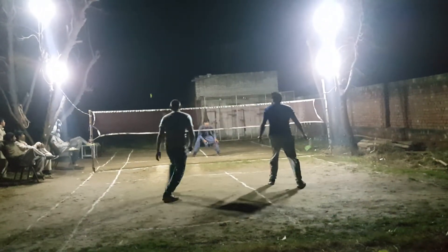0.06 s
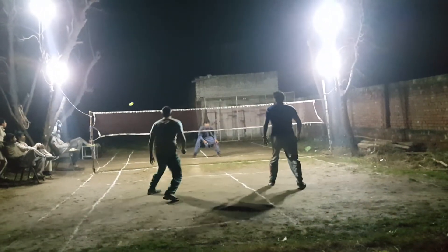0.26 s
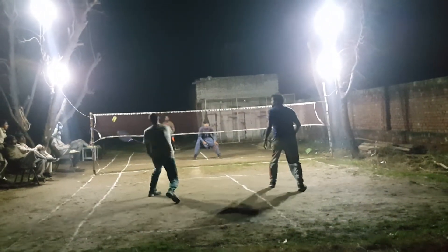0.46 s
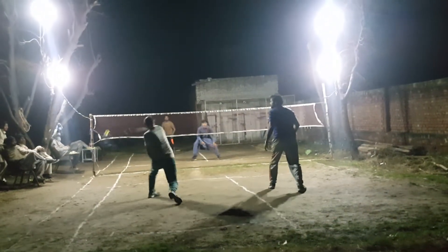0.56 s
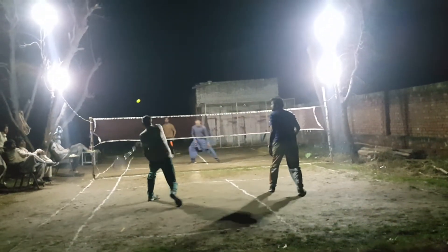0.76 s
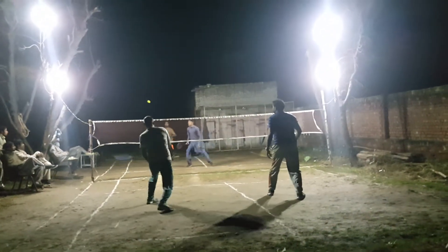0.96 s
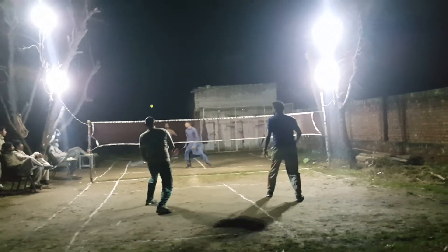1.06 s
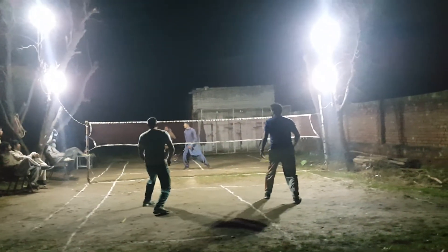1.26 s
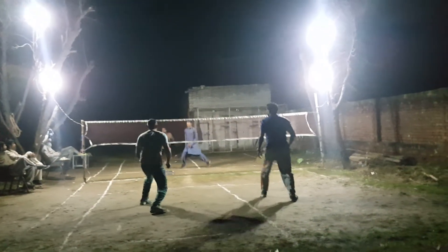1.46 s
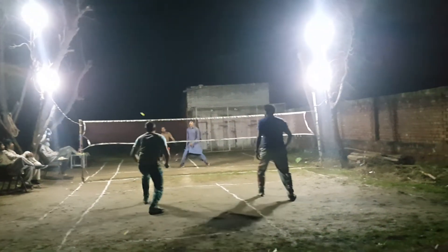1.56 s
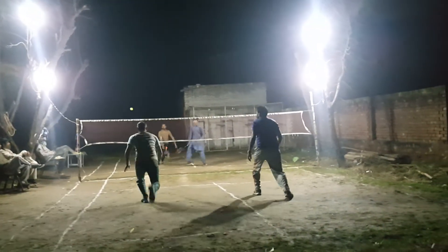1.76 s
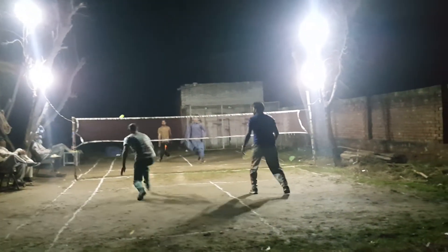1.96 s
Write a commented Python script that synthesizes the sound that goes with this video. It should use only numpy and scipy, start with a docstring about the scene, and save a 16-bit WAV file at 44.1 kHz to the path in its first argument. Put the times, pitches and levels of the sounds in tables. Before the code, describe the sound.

Badminton hits echo across an outdoor court, with footsteps, gritty scuffs and small dry ticks.

```python
"""A badminton rally on an outdoor dirt court, over the faint, steady rumble of night air.
First a sole scuffs the grit and a shoe lands. Then comes a hard smash: the cork knocks, the strings
ring, the ground bounce adds a hollow colour and the walls echo. A softer return follows.
After one second small dry ticks begin close by, and a distant third stroke comes at a second and a half.
The rally ends with more steps, ticks and the loudest scuffs."""
import sys
import numpy as np
from scipy import signal
from scipy.fft import rfft, irfft
from scipy.io import wavfile

SR = 44100
rng = np.random.default_rng(int(sys.argv[2]) if len(sys.argv) > 2 else 0)


def generate_wav(signal):
    """Clip the signal to [-1, 1] and save it as 16-bit WAV at the path in sys.argv[1]."""
    frames = np.transpose(np.atleast_2d(signal))
    scaled = np.clip(frames, -1, 1) * 32767
    pcm = np.round(scaled).astype(np.int16)
    wavfile.write(sys.argv[1], SR, pcm)


N = 88200


def undb(db):
    """Turn decibels into a number to multiply by."""
    return 10 ** (np.asarray(db) / 20)


def level(x, db):
    """Give a short sound the energy of 10 ms at this level."""
    energy = np.mean(np.sum(x ** 2, axis=-1))
    return x * undb(db) / np.sqrt(energy / (SR / 100) + 1e-20)


def curve(points, hz):
    """Read between (Hz, value) points, with all octaves equally wide."""
    p = np.array(points, float)
    return np.interp(np.log(hz + 1), np.log(p[:, 0]), p[:, 1])


def bins():
    """The frequencies in Hz on which the filters work."""
    return np.arange(N + 1) * SR / (2 * N)


def shape(x, db):
    """Turn each frequency up or down by its dB value, without ringing ahead of the sound."""
    cepstrum = irfft(db * np.log(10) / 20)
    cepstrum[1:N] *= 2
    cepstrum[N + 1:] = 0
    return irfft(rfft(x, 2 * N) * np.exp(rfft(cepstrum)))[..., :N]


def hump(hz, octaves):
    """A rounded peak around one frequency, in dB."""
    distance = np.log2((bins() + 10) / hz) / octaves
    return -20 * np.log10(1 + distance ** 2 / 2 + distance ** 4 / 10)


def fade(t60):
    """Die away by 60 dB in t60 seconds, the fade time."""
    return undb(-60 * np.arange(N) / SR / max(t60, .001))


def noise():
    """Stereo noise, alike in both ears in the bass and wide in the treble."""
    # Each row: frequency in Hz, level in dB of the side signal against the middle one.
    width = [(60, -19), (250, -11.5), (600, -3.5), (1500, -1.5), (4000, 0.5), (16000, 1.5)]
    mid, side = rng.standard_normal((2, N))
    side = irfft(rfft(side) * undb(curve(width, bins()[::2])), N)
    return np.array([mid + side, mid - side])


def delay(x, s):
    """Start a sound s seconds later."""
    return irfft(rfft(x, 2 * N) * np.exp(-2j * np.pi * bins() * s))[..., :N]


def pan(x, db):
    """Lean a sound to the left by db, or to the right if db is negative."""
    return x * undb(np.array([[db], [-db]]) / 2)


def through(x, response):
    """Play a sound through a stereo pattern of echoes."""
    return signal.fftconvolve(np.atleast_2d(x), response, axes=-1)[:, :N]


def night_air(level_db=-62):
    """The surroundings give a low, steady rumble with a thin hiss."""
    # Each row: frequency in Hz, relative level of the air in dB.
    colour = [(15, -13), (25, -11), (45, -2.5), (92, -5), (150, -5), (250, -13), (363, -16.5), (734, -17.5),
              (1000, -21), (1700, -22.5), (3160, -30.5), (5000, -38), (7500, -37), (9570, -43.5),
              (15000, -39.5)]
    hz = bins()[::2]
    air = irfft(rfft(noise()) * undb(curve(colour, hz)) * (hz > 20), N)
    return air / air.std() * undb(level_db)


def scuffs(grains_per_s=6000, spread_db=3.5, fade_db=10.5):
    """A sliding sole crushes a shower of grains that grows quieter as it stops."""
    # Each row: start and length in seconds, level in dB, centre in Hz, lean to the left in dB.
    slides = [(0, 0.044, -61, 6700, 1.5), (0.431, 0.099, -64.5, 7500, 3.5),
              (0.932, 0.088, -66.5, 7000, 3.5), (1.7318, 0.042, -44.5, 5300, -3),
              (1.779, 0.047, -43.5, 4500, -1), (1.8537, 0.049, -42.5, 2940, 4.5),
              (1.902, 0.047, -53, 2970, 6.5), (1.972, 0.072, -56, 7040, 0)]
    # Each row: frequency in Hz, relative level of the crunching grit in dB.
    colour = [(300, -18), (1100, -5), (1600, -12), (2200, 0), (2600, 0), (3150, 5), (3550, -5), (4100, 0),
              (4800, -8.5), (6400, -6.5), (7300, -5), (8800, -2), (10200, -9), (13000, -9), (16000, -7)]
    t, out = np.arange(N) / SR, 0
    for start, length, db, hz, pan_db in slides:
        hits = rng.random(N) < grains_per_s / SR
        sizes = undb(spread_db * np.clip(rng.standard_normal(N), -2, 2))
        crunch = shape(hits * sizes * noise(), curve(colour, bins()) + hump(hz, octaves=1.25))
        loudness = undb(-fade_db * t / length) * np.clip((length - t) / 0.01, 0, 1)
        out = out + delay(pan(crunch / crunch.std() * loudness * undb(db), pan_db), start)
    return out


def steps():
    """Shoes pat the packed earth, each pat a dull burst of noise."""
    # Each row: start in seconds, level in dB, centre in Hz, width in octaves, fade time in seconds.
    footfalls = [(0.1855, -47, 1050, 0.57, 0.019), (.1930, -43.5, 780, 0.98, 0.17),
                 (.5850, -61.5, 500, 0.97, 0.061), (0.5963, -53.5, 590, 0.66, 0.068),
                 (1.1830, -57, 550, 0.95, 0.061), (1.2050, -64.5, 1000, 0.95, 0.012),
                 (1.3900, -65.5, 1300, 0.9, 0.0074), (1.6630, -62, 690, 1, 0.028),
                 (1.6710, -50, 177, 1.45, 0.063), (1.9765, -50.5, 1250, 0.72, 0.019),
                 (1.9930, -53, 817, 1, 0.078)]
    out = 0
    for start, db, hz, octaves, t60 in footfalls:
        pat = shape(noise() * fade(t60), hump(hz, octaves))
        out = out + delay(level(pat, db), start)
    return out


def strokes(space, ground_s=.0072, ground_db=-2.5, rattle_rise_s=0.0021):
    """The cork knocks, tones ring, frame and feathers rattle, and ground, yard and walls answer."""
    # Each row: start in seconds, levels of knock, tick, rattle and ring in dB, yard level against
    # the stroke in dB, lean to the left in dB, right ear's lag in ms, cork's time on the strings in ms.
    hits = [(0.2076, -21.5, -42.5, -21, -21.5, -10.5, 0, 0.06, 0.34),
            (0.6493, -34, -42.5, -35, -32, -12, 1.5, 0.14, 0.83),
            (1.4891, -48.5, -63.5, -50.5, -46.5, -6.5, 1, 0.11, 0.48)]
    # One list per stroke. Each row: frequency in Hz, relative level of the knock in dB.
    knock_colours = [
        [(40, -39.5), (130, -8), (300, -2.5), (750, -7), (1100, -0.5), (1400, -3.5), (1900, -7), (2650, -13.5),
         (3200, -12), (4500, -25.5), (8000, -22.5), (10000, -32.5), (16000, -44)],
        [(40, -20), (130, 0), (300, 0), (450, -3.5), (850, -2), (1300, -8.5), (1750, -9), (2900, -19),
         (4500, -22), (8500, -30), (16000, -55)],
        [(40, -30), (130, -6), (400, 0), (750, -16), (1080, -6.5), (1400, -11), (2200, -11), (3500, -24),
         (16000, -34)],
    ]
    # Ringing tones of each stroke: the low ones are the hollow colour of the ground bounce, the higher
    # ones the strings. Each row: pitch in Hz, relative level in dB, fade time in seconds.
    ringing_tones = [
        [(137.4, -12.5, .25), (290.3, -14.5, .15), (397, -16, 0.2), (562, -8.5, 0.12), (695, -11, 0.19),
         (967, -6.5, 0.13), (1113, 3.5, 0.1), (1206, -18.5, .16), (1440, -13.5, 0.098), (1867, -9.5, 0.089),
         (2287, -12, 0.087), (3130, -14.5, 0.21), (3200, -19.5, 0.11)],
        [(839, -1.5, 0.077), (907, -9.5, 0.43), (1763, -10, 0.13), (2276, -8, 0.17), (3330, -11.5, 0.067),
         (4366, -29, 0.21), (4470, -26, 0.23)],
        [(1073, 6, 0.083), (1631, -9, 0.37), (2116, -7.5, 0.44), (2902, -11, 0.39)],
    ]
    t, out, played = np.arange(N) / SR, 0, []
    for hit, colour, tones in zip(hits, knock_colours, ringing_tones):
        start, knock_db, tick_db, rattle_db, ring_db, yard_db, pan_db, lag_ms, dwell_ms = hit
        colour_db = curve(colour, bins())
        knock = level(shape(signal.unit_impulse(N), colour_db), knock_db)
        ring = sum(undb(db) * np.sin(2 * np.pi * hz * t) * fade(t60) for hz, db, t60 in tones)
        ring = level(ring, ring_db)
        tick = level(shape(noise() * fade(t60=0.008), hump(hz=8000, octaves=0.84)), tick_db)
        shake = noise() * fade(t60=0.085) * (1 - np.exp(-t / rattle_rise_s))
        rattle = level(shape(shake, colour_db), rattle_db)
        direct = knock + ring + undb(ground_db) * delay(knock, ground_s)
        ears = np.array([direct, delay(direct, lag_ms / 1000)])
        near = delay(ears + rattle, dwell_ms / 1000) + tick
        stroke_db = 10 * np.log10(np.sum(near ** 2) / 2 / (SR / 100))  # same scale as level()
        into_yard = level(knock + ring / 2 + tick[0] / 2, stroke_db + yard_db)
        out = out + delay(pan(near, pan_db) + through(into_yard, space), start)
        played.append((start, knock, stroke_db))
    return out + wall_echoes(played)


def yard(rise_s=0.0095):
    """Walls, trees and ground blur a sound into a wash of echoes; the bass stays longest."""
    # Each row: frequency in Hz, fade time in seconds.
    fade_times = [(150, 0.65), (500, 0.53), (1500, 0.56), (4000, 0.47), (9000, 0.32), (16000, 0.33)]
    # Each row: frequency in Hz, boost or cut of the wash in dB.
    colour = [(60, -1.5), (150, 5), (400, 0.5), (900, -4), (1600, 2.5), (3000, -0.5), (5000, 5),
              (8000, 4.5), (16000, 2)]
    t, spectrum, wash = np.arange(N) / SR, rfft(noise()), 0
    for k, (_, t60) in enumerate(fade_times):
        band = curve([(hz, j == k) for j, (hz, _) in enumerate(fade_times)], bins()[::2])
        wash = wash + irfft(spectrum * band, N) * fade(t60)
    wash = wash * (1 - np.exp(-t / rise_s)) ** 2
    return shape(wash / np.sqrt(np.sum(wash ** 2) / 2), curve(colour, bins()))


def wall_echoes(played):
    """The walls throw back smeared copies of the latest knock."""
    # Each row: start in seconds, level against the stroke in dB, centre in Hz, width in octaves,
    # fade time of the smear in seconds, lean to the left in dB.
    echoes = [(.2400, -15.5, 2250, 3.9, 0.011, -4.5), (.2750, -17, 1000, 2.2, 0.044, 1.5),
              (0.291, -30.5, 1200, 2.2, 0.046, 4), (.3320, -26, 1500, 1.8, 0.071, 3),
              (0.374, -22.5, 1600, 0.26, 0.018, 3.5), (.3830, -28.5, 596, 2.1, 0.039, 0.5),
              (0.675, -14, 2400, 0.39, 0.003, 1.5), (.7305, -11.5, 346, 1.74, 0.044, 0),
              (0.7685, -17.5, 1200, 1.2, 0.022, -1), (.7730, -17, 280, 0.78, 0.054, -0.5),
              (0.839, -27, 500, 2.6, 0.18, 1), (1.5709, -5.5, 1800, 0.85, 0.0097, 3)]
    out = 0
    for start, db, hz, octaves, smear, pan_db in echoes:
        _, knock, stroke_db = [stroke for stroke in played if stroke[0] < start][-1]
        echo = shape(through(knock, noise() * fade(smear)), hump(hz, octaves))
        out = out + delay(pan(level(echo, stroke_db + db), pan_db), start)
    return out


def ticks():
    """Dry snaps sound close by, each a few milliseconds of bright noise."""
    # Each row: start in seconds, level in dB, centre in Hz, fade in seconds, lean to the left in dB.
    snaps = [(1.033, -60.5, 2500, 0.0064, -7), (1.111, -73.5, 3280, 0.021, -1),
             (1.154, -68, 3570, 0.011, 4), (1.1823, -64.5, 3550, 0.016, -2),
             (1.3000, -46.5, 5100, 0.0086, -2.5), (1.3564, -63, 5000, 0.0033, 3),
             (1.3930, -68, 9000, 0.0064, -6), (1.4272, -54.5, 4570, 0.011, 0),
             (1.5177, -42.5, 8400, 0.0055, 0), (1.5460, -56, 8900, 0.0095, 2),
             (1.5610, -49, 6550, 0.0052, -4), (1.5625, -38, 6500, 0.0086, 1.5),
             (1.596, -56, 8000, 0.0033, 1), (1.6013, -50.5, 8000, 0.0054, -7),
             (1.644, -58, 4900, 0.0037, 8), (1.675, -61.5, 5970, 0.017, 2), (1.6993, -62, 6050, .005, -4),
             (1.714, -55, 8600, 0.0088, 6), (1.754, -49.5, 5130, .006, 8), (1.7981, -47, 4520, 0.018, -7),
             (1.856, -56.5, 4660, 0.0071, -10), (1.8830, -52.5, 5000, 0.0034, -1.5),
             (1.921, -57, 5000, 0.002, 8), (1.9268, -56, 6980, 0.0024, -13),
             (1.945, -55.5, 9050, 0.0084, -2), (1.959, -57.5, 9900, 0.014, -14.5)]
    # Each row: frequency in Hz, relative level of a snap in dB.
    colour = [(300, -24), (1200, -8), (2000, 7), (2700, -3), (3300, 2), (4000, -1.5), (4800, -0.5),
              (6000, -3), (7800, 2), (10000, -7), (12500, -3.5), (16000, -1)]
    out = 0
    for start, db, hz, t60, pan_db in snaps:
        snap = shape(noise() * fade(t60), curve(colour, bins()) + hump(hz, octaves=0.85))
        out = out + delay(pan(level(snap, db), pan_db), start)
    return out


def scene(step_yard_db=-10.5, grit_yard_db=-23.5):
    """Strokes, footwork and ticks echo in the same yard, over the night air."""
    space, feet, grit = yard(), steps(), ticks() + scuffs()
    wash = through(feet * undb(step_yard_db) + grit * undb(grit_yard_db), space)
    return strokes(space) + feet + grit + wash + night_air()


def record(dry, top_hz=15900):
    """The right microphone is brighter at the very top; the highest treble is cut."""
    # Each row: frequency in Hz, level of the left microphone against the right in dB.
    balance = [(100, -1), (3000, 3), (8000, 0.5), (12000, -2.5), (16000, -4.5)]
    lean = curve(balance, bins()) / 2
    both = np.array([shape(dry[0], lean), shape(dry[1], -lean)])
    return signal.sosfilt(signal.ellip(10, .2, 80, top_hz, fs=SR, output="sos"), both)


dry = scene()
out = record(dry)
generate_wav(out)
```